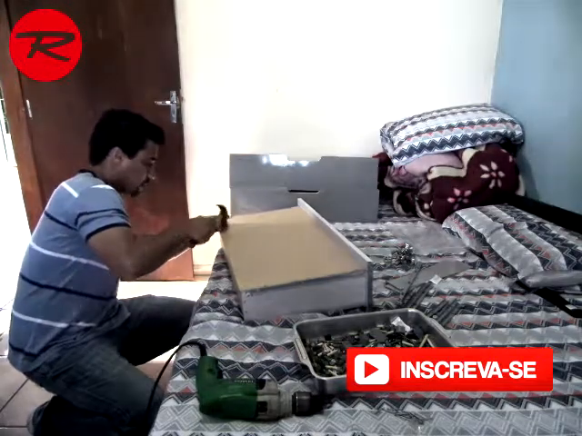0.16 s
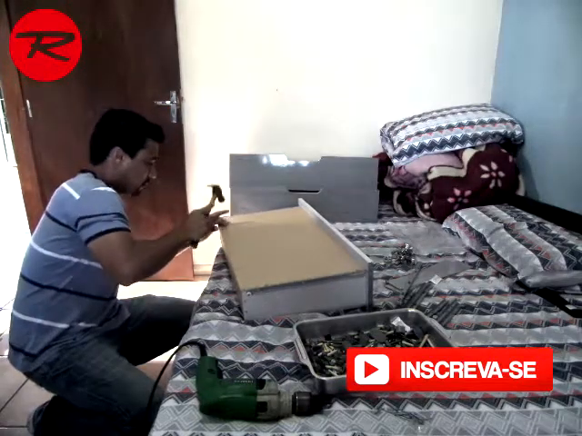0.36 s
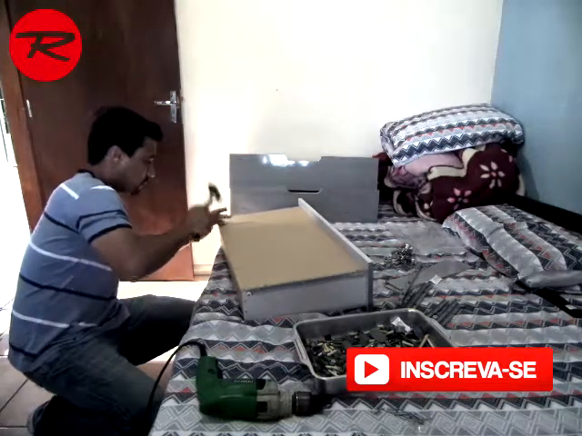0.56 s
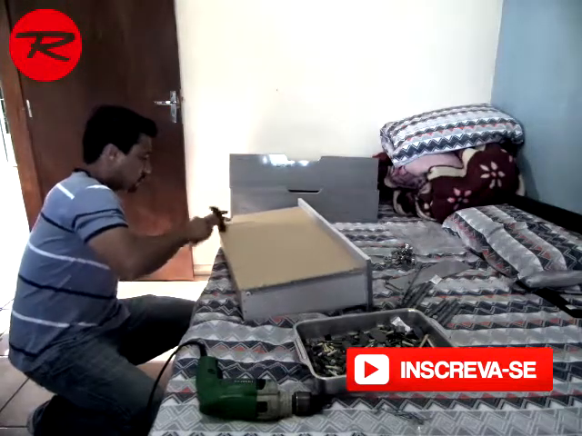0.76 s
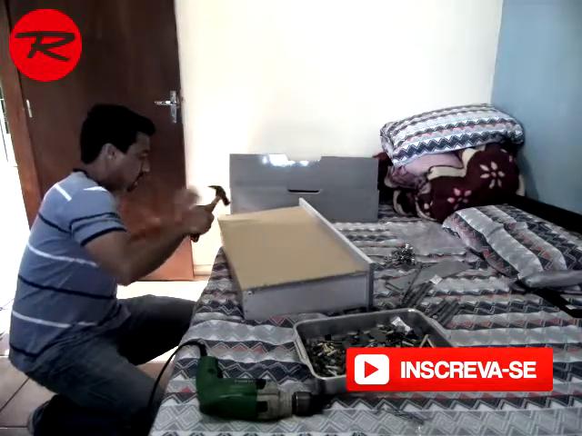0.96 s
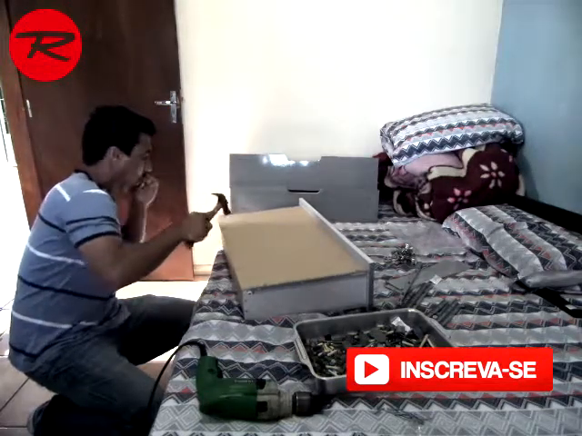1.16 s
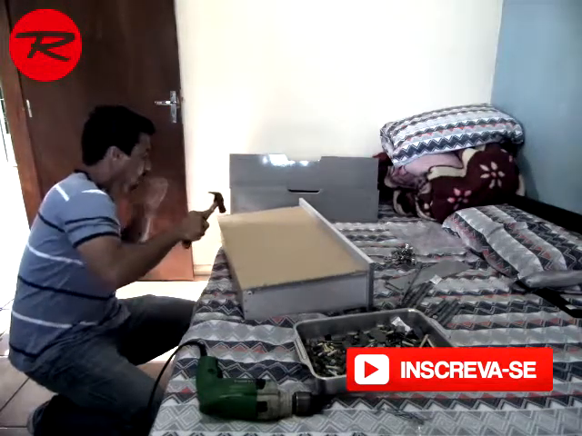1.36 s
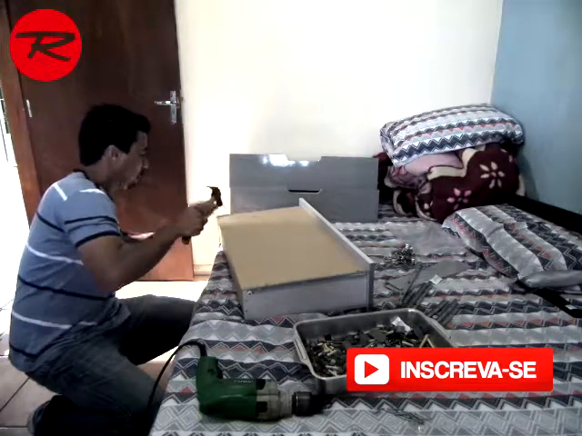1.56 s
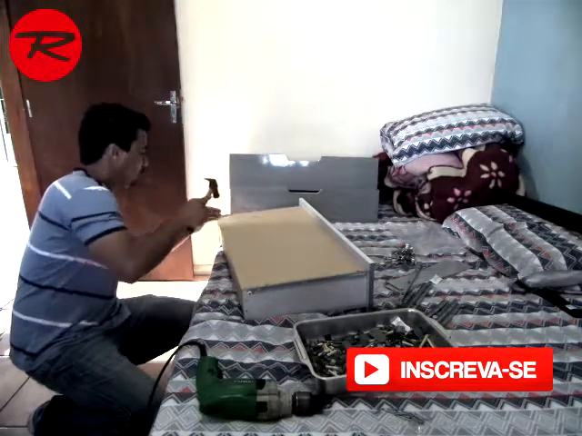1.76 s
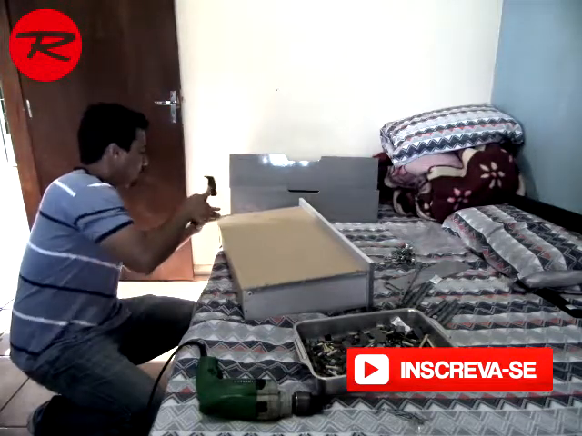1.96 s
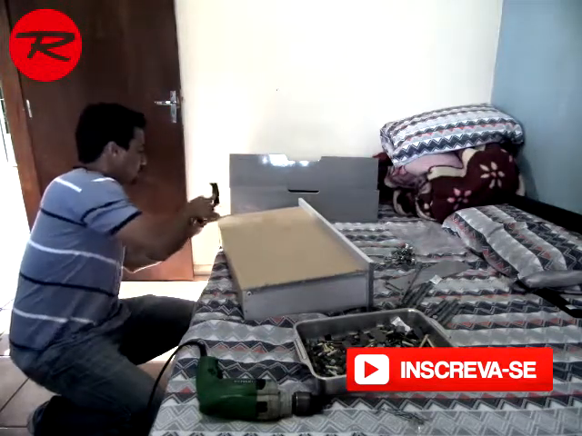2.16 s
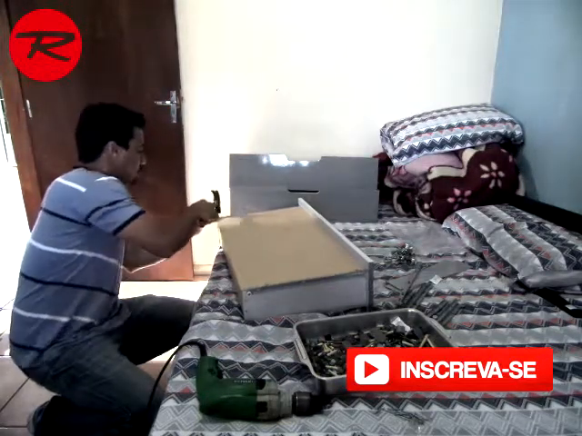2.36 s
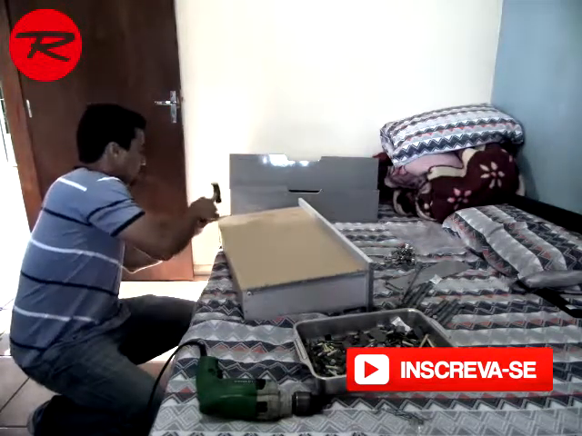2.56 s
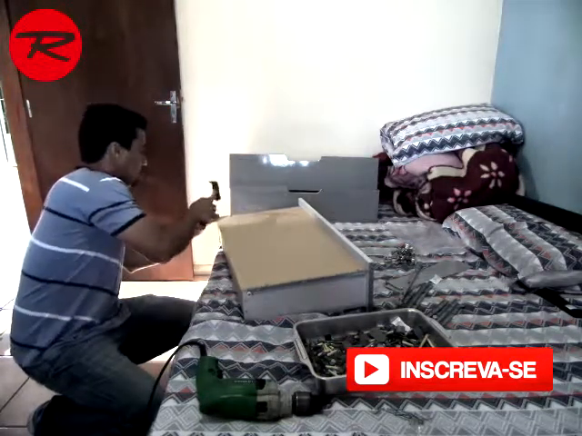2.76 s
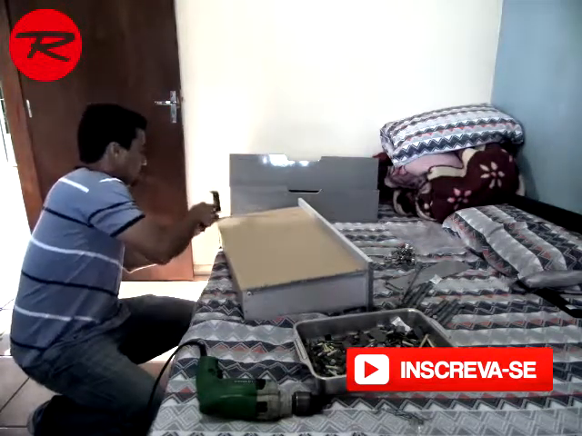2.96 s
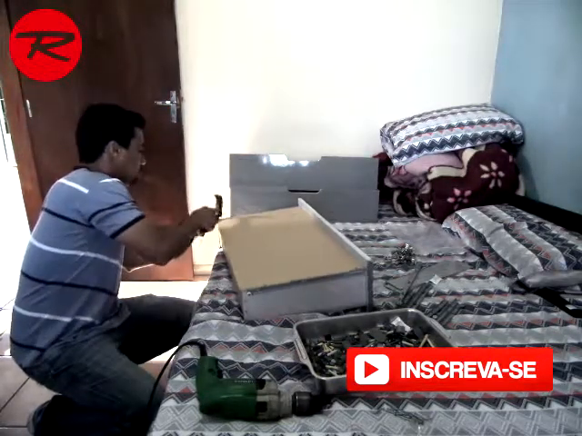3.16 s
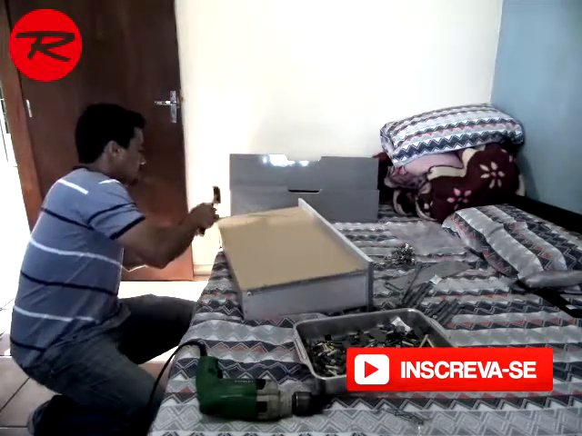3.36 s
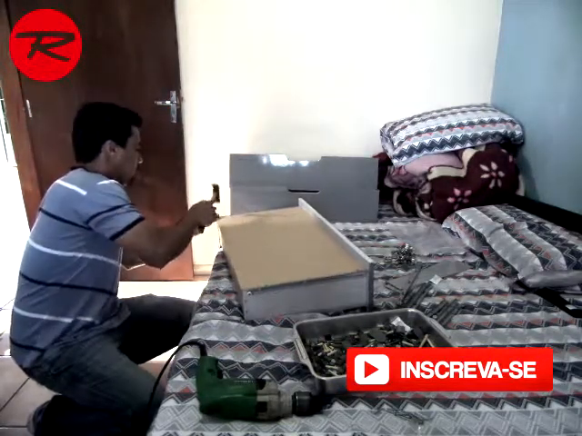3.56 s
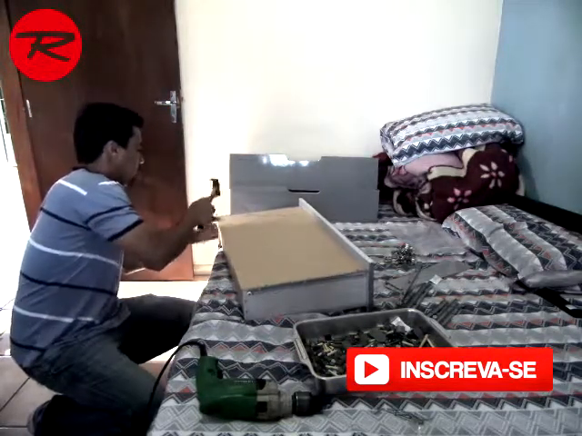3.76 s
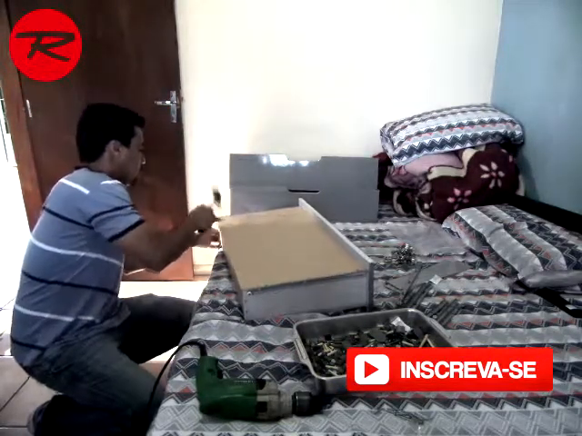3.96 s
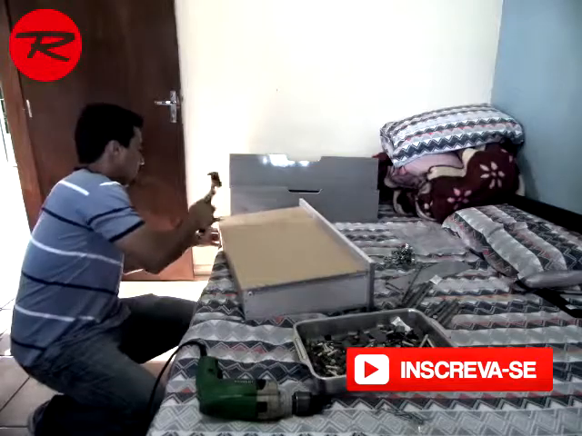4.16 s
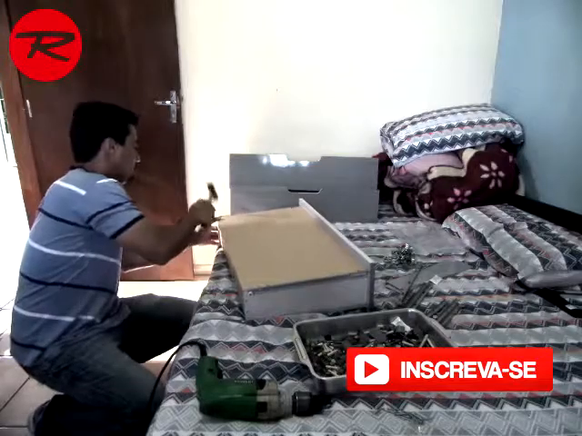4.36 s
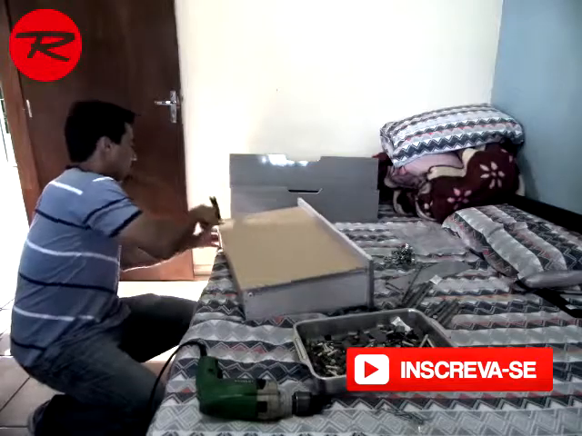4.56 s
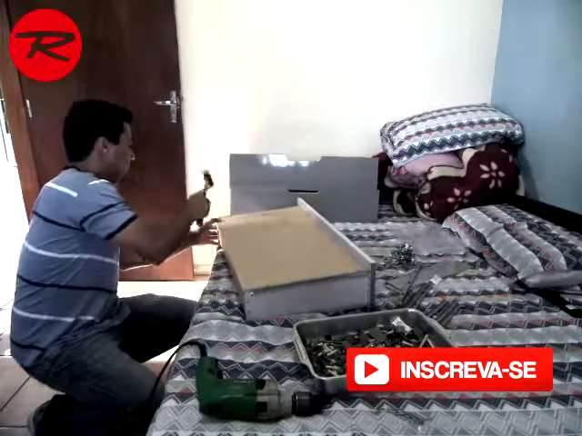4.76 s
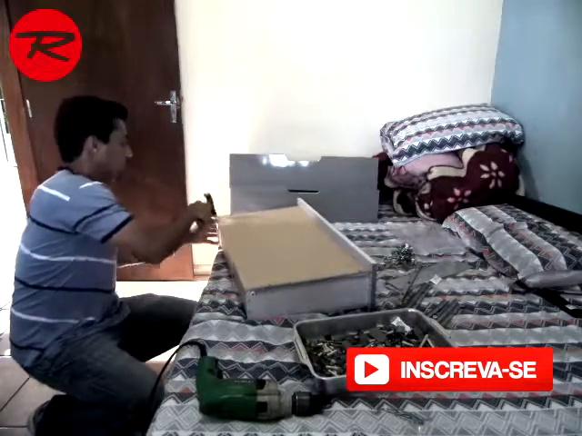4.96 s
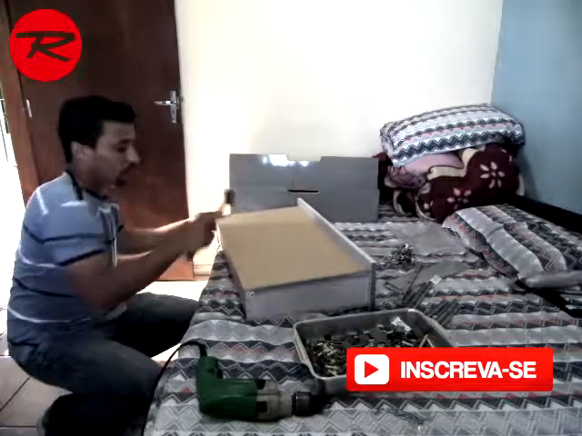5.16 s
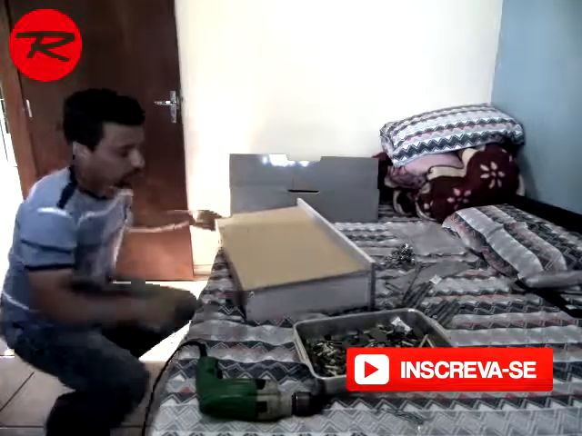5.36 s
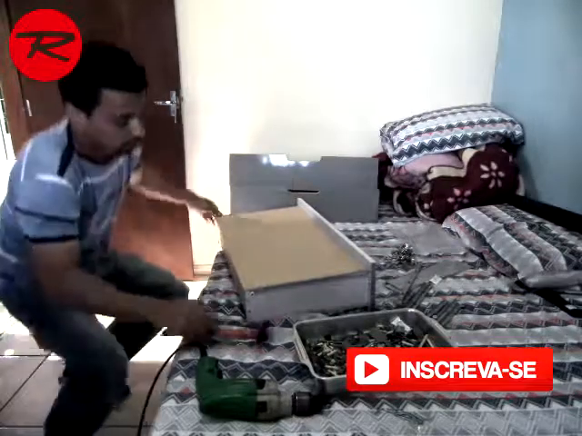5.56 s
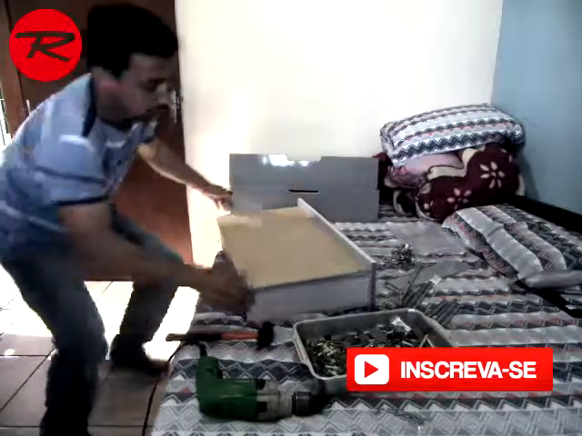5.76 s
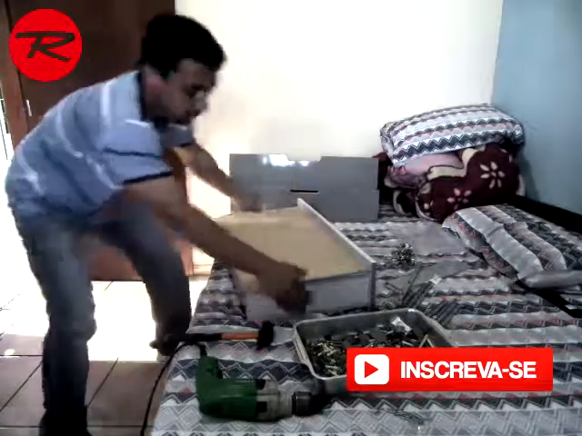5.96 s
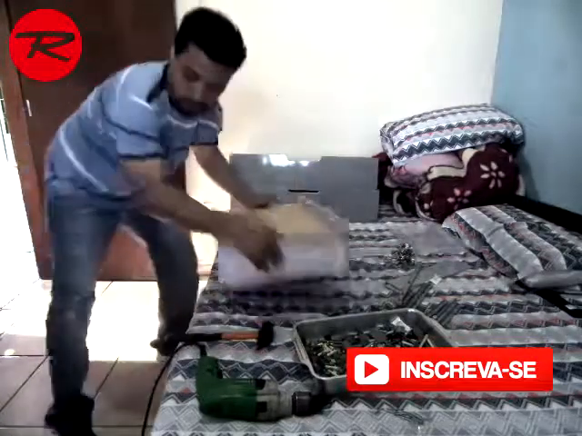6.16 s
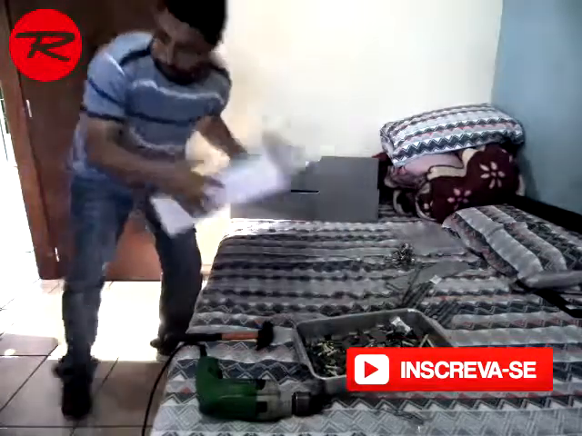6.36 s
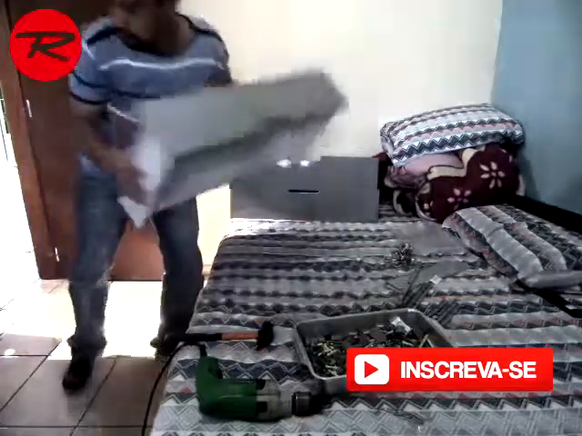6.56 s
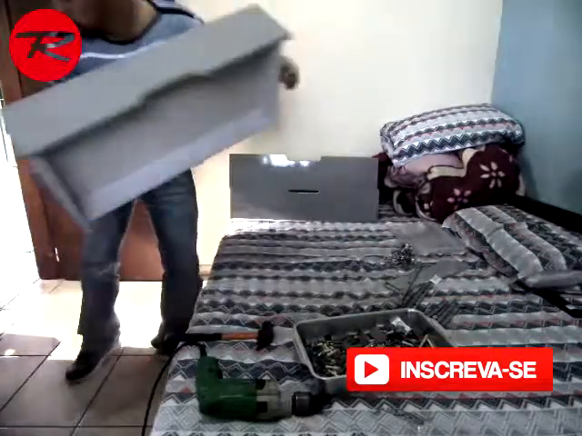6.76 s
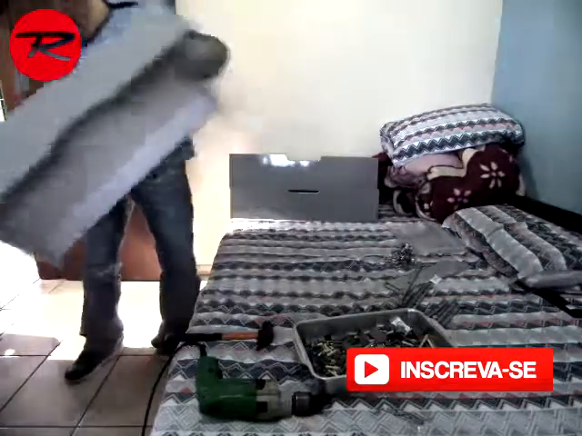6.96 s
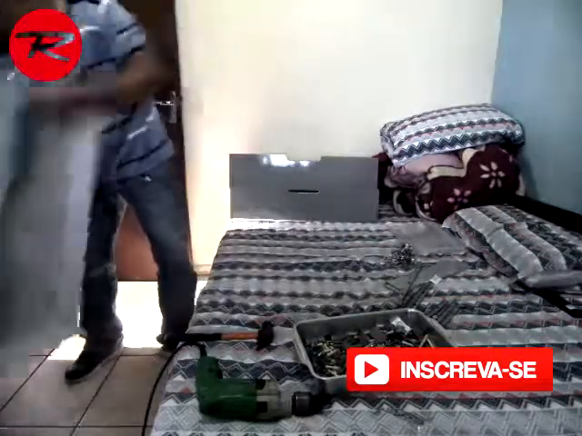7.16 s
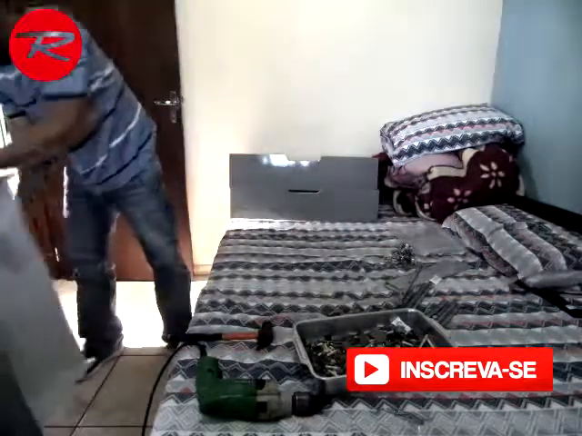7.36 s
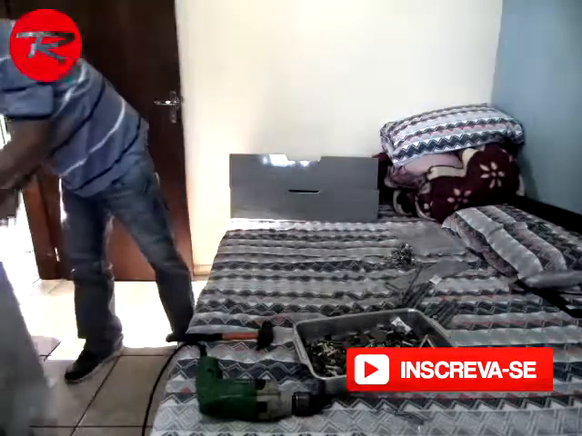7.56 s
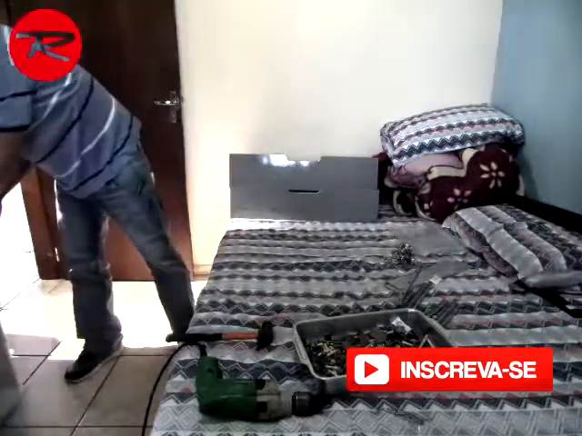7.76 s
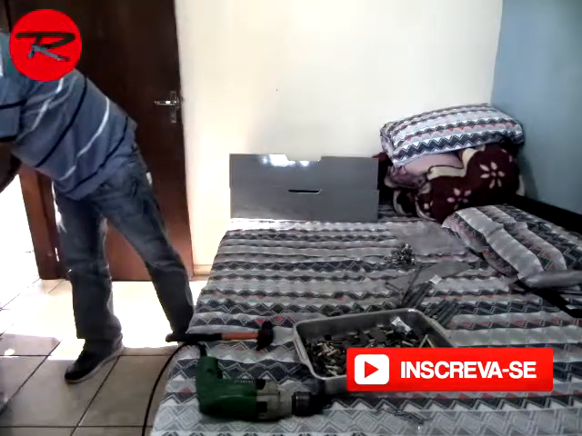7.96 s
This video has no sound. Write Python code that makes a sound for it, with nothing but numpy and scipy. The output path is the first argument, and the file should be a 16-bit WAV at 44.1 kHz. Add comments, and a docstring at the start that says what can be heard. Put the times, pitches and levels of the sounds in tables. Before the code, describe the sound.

Close, sharp hammer blows drive nails into a hollow wooden panel in three short runs, ringing briefly in a small room. A faint nail clink and two gentle taps come between the first two runs. After the hammering stops, soft footsteps, fabric swishes and small squeaks follow the drawer being lifted and carried, until it lands on the tiled floor with a wooden thud and a click of fittings. A faint hum lies underneath.

```python
"""A small, hard-walled room, where three nails are hammered into the bottom of a drawer lying on a bed.
Each blow is a steel tick, a crack and the boom of the panel; a fast limiter catches the hardest peaks.
A loose nail clinks as it is picked up. Then feet shuffle, clothes rustle and wood rubs and squeaks as
the drawer is lifted, swung round and set down on the tiled floor, its frame knocking and its fittings
clacking. Quiet air and a faint hum lie underneath, and a low drone grows towards the end."""
import sys
import numpy as np
from scipy import signal
from scipy.io import wavfile
from scipy.ndimage import uniform_filter1d, minimum_filter1d

SR = 44100
rng = np.random.default_rng(int(sys.argv[2]) if len(sys.argv) > 2 else 0)


def transcribe(signal):
    """Save signal, clipped to [-1, 1], as a 16-bit WAV file at the path in sys.argv[1]."""
    frames = np.atleast_2d(signal).T
    limited = np.clip(frames, -1, 1)
    pcm = np.round(limited * 32767).astype(np.int16)
    wavfile.write(sys.argv[1], SR, pcm)


N = 352800
TIME = np.arange(N) / SR
AGE = TIME[:SR * 3 // 4]   # seconds since an impact
CUTOFF_HZ = 15650
EDGES_HZ = np.geomspace(22, 17500, 28)
CENTRES_HZ = np.sqrt(EDGES_HZ[1:] * EDGES_HZ[:-1])
BANK = [signal.butter(2, edge, "band", fs=SR, output="sos") for edge in zip(EDGES_HZ, EDGES_HZ[1:])]

# noise colours, shape only: frequency_hz, density_db
AIR = [(25, -10), (50, -0.5), (80, -15), (130, -10), (220, -10), (330, -15.5), (600, -16), (1200, -24),
       (2000, -26.5), (5000, -32.5), (16000, -39)]   # room tone
SHUFFLE = [(70, -40.5), (150, 2.5), (250, -6.5), (400, -15), (700, -19.5)]   # feet
RUBBING = [(250, -10), (500, 0.5), (1000, -4.5), (1800, -8.5), (3500, -15)]   # wood on the bedcover
CLOTH = [(1800, -11.5), (3200, -4), (6000, -6.5), (9000, -9.5), (13000, -7.5), (16000, -10)]   # hiss of fabric
BUMP_THUMP = [(45, 13), (65, -26), (95, -9), (130, -4), (200, 16), (320, 0)]   # low end of a bump
BUMP_KNOCK = [(200, -37), (350, 6.5), (600, 4), (900, -6), (1400, -6.5), (2800, -20.5)]   # its woody middle
BOOM = [(30, -20.5), (42, -25.5), (55, -9), (85, -34.5), (112, -25.5), (145, -7), (200, -1.5), (320, -7.5)]   # low end of a hammer blow
KNOCK = [(200, -25), (330, -2), (600, 0), (950, -3.5), (1280, -4), (1800, -9), (2600, -16.5)]   # its woody middle
CRACK = [(1300, -23), (2200, 3), (3200, 1.5), (5000, -1.5), (8000, -6), (11000, -15.5)]   # hard edge of a hit
PING = [(6000, -22), (9500, -13.5), (11000, 0), (12500, -2), (15000, 2), (16500, -8)]   # steely top

# the room's decay: frequency_hz, t60_s
ROOM_T60 = [(60, 0.66), (170, 0.34), (500, 0.4), (1500, 0.42), (3000, 0.41), (5500, 0.38), (8000, 0.35),
            (11000, 0.3), (16000, 0.19)]
# faint hum: pitch_hz, rms_db
HUM = [(54, -73.5), (194, -77), (258, -75), (361, -79)]
# shifting along the drawer, then carrying it: start_s, end_s, start_db, end_db
MOVES = [(1.405, 3.997, -73, -57.5), (5.404, 7.778, -72, -57.5)]
# swishes of clothes and bedcover: peak_s, rise_s, rub_db, hiss_db
SWISHES = [(3.64, 0.033, -58, -57.5), (5.48, 0.057, -84, -81), (5.85, 0.036, -67, -63),
           (6.12, 0.069, -72, -69.5), (6.32, 0.095, -81, -62.5), (6.73, 0.06, -60.5, -57.5),
           (7.0, 0.053, -57.5, -61.5), (7.07, 0.055, -76, -60), (7.35, 0.039, -68, -68)]
# squeaks of wood and fittings: peak_s, half_length_s, pitch_hz, width_hz, relative_db
SQUEAKS = [(6.313, .04, 1600, 28, -70), (6.471, 0.022, 1595, 18, -59), (6.755, 0.056, 5400, 570, -61),
           (6.822, 0.034, 1730, 257, -56.5), (6.893, .025, 4320, 120, -68), (7.06, 0.032, 1720, 150, -62),
           (7.134, 0.084, 3250, 190, -64.5)]
# the drawer handled and set down, levels before trim: start_s, thump_db, knock_db, rattle_db
BUMPS = [(5.969, -48, -72, -83), (6.754, -45, -49, -58), (7.348, -57, -59.5, -76), (7.786, -21, -20, -33)]
# clicks of its fittings, levels before trim: start_s, clack_db, ping_db
CLICKS = [(7.3407, -70, -57), (7.896, -36.5, -38.5)]
# modes of the drawer's frame: pitch_hz, relative_db, t60_s
FRAME_MODES = [(133.2, -11, 0.99), (191, -9, 0.4), (267, 3, 0.33), (328, -9, 0.49), (406.7, 5, 0.28),
               (529, 7, 0.23), (598, 3, 0.27), (633, -11, .26), (915, -27, 0.33)]
# modes of a loose nail: pitch_hz, relative_db, t60_s
NAIL_MODES = [(2620, -10, 0.37), (3180, -3, 0.23), (3494, -2, 0.23), (3580, -6, 0.23), (4888, -11, .28),
              (5281, -12, .3), (6060, -5, 0.23), (6150, -6, 0.24), (7472, -13, 0.32)]
# modes of the panel, driven differently from each nail: pitch_hz, first_db, second_db, third_db
PANEL_MODES = [(143.4, -4.5, -8, -10), (159.75, -3, -6.5, -3), (205.3, 1, 5.5, -0.5),
               (216.3, -10.5, -3, -3.5), (249.6, -1, 2, -3.5), (275, 0.5, 2, -0.5), (293, -4.5, -5, -17.5),
               (353, -10.5, -8.5, -14), (401, -18, -14.5, -16), (435, -3, -1, -9), (461, -6, -5.5, -5),
               (510, -13.5, -19.5, -9.5), (595, -11.5, -8.5, -14), (649, -14, -9, -17.5),
               (852, -9.5, -29, -15), (951, -16, -20.5, -13.5), (1256, -14.5, -14, -14.5)]
# hammer blows: start_s, force_db, give (0 = the nail is home, 1 = it sinks freely)
BLOWS = [(0.105, -1.44, 0.61), (0.407, -2, 0.73), (0.686, -0.9, 0), (2.311, -17, 0.56), (2.599, -17, 0.84),
         (2.865, -4, 0.48), (3.109, -2, 0.52), (3.386, -1, 0.58), (3.964, -2.35, 1), (4.227, -2.6, 1),
         (4.502, -0.05, 0.31), (4.802, -0.5, 0.084)]


def from_db(db):
    """Decibels to gain."""
    return 10 ** (np.asarray(db) / 20)


def at_hz(points, hz, outside=None):
    """Read a table on a log-frequency axis."""
    known, values = np.transpose(points)
    return np.interp(np.log(hz), np.log(known), values, outside, outside)


def colour(spectrum, db=0):
    """Band gains that give white noise this colour at about this rms level."""
    gains = from_db(at_hz(spectrum, CENTRES_HZ, outside=-np.inf))
    return from_db(db) * gains / np.sqrt(np.sum(gains ** 2 * np.diff(EDGES_HZ)) * 2 / SR)


def noise(spectrum):
    """Steady coloured noise, rms about 1."""
    white = rng.standard_normal((2, N))
    return sum(g * signal.sosfilt(BANK[k], white[k % 2]) for k, g in enumerate(colour(spectrum)) if g > 0)


def low_cut(sound, hz, order=2):
    """Roll off everything below hz."""
    return signal.sosfilt(signal.butter(order, hz, "high", fs=SR, output="sos"), sound)


def add(out, start_s, sound):
    """Mix a sound in at its time."""
    start = round(start_s * SR)
    low, high = max(start, 0), min(start + len(sound), N)
    out[low:high] += sound[low - start:high - start]


def attack(build_s):
    """An envelope that swells from 0 to 1."""
    return 1 - np.exp(-AGE / build_s)


def decay(t60_s):
    """An envelope that falls 60 dB in t60_s."""
    return np.exp(-np.log(1000) * AGE / t60_s)


def ramp(start_s, end_s, start_db, end_db, fade_s=.1):
    """A steady fader ride that dies away at both ends."""
    outside_s = np.maximum(np.maximum(start_s - TIME, TIME - end_s), 0)
    ride_db = np.interp(TIME, [start_s, end_s], [start_db, end_db])
    return from_db(ride_db) * np.exp(-(outside_s / fade_s) ** 2)


def wavering(hz, width_hz):
    """A tone of rms 1 whose wandering phase blurs its pitch."""
    wander = np.sqrt(2 * np.pi * width_hz / SR) * np.cumsum(rng.standard_normal(N))
    return np.sqrt(2) * np.sin(2 * np.pi * hz * TIME + wander)


def room_tone():
    """Quiet air and a faint, wavering hum."""
    return from_db(-69) * noise(AIR) + sum(from_db(db) * wavering(hz, width_hz=11) for hz, db in HUM)


def drone():
    """A low tone grows as the drawer is carried off."""
    return ramp(start_s=6, end_s=8, start_db=-67.5, end_db=-56.5) * wavering(hz=159, width_hz=13.67)


def swish(peak_s, rise_s, release_ratio=2.1):
    """The envelope of one sweep of cloth: it rises to 1 and fades more slowly."""
    slope_s = np.where(TIME < peak_s, rise_s, rise_s * release_ratio)
    return np.exp(-((TIME - peak_s) / slope_s) ** 2)


def catching(depth_db=2.0, per_s=70):
    """Rubbing surfaces catch and slip, so their level is lumpy."""
    steps = rng.standard_normal(4000)
    return from_db(depth_db * np.interp(TIME * per_s, np.arange(len(steps)), steps))


def movement():
    """Feet shuffle, wood rubs on the bedcover and cloth hisses, with single swishes on top."""
    effort = sum(ramp(*move) for move in MOVES)
    rub = sum(from_db(db) * swish(peak_s, rise_s) for peak_s, rise_s, db, _ in SWISHES)
    hiss = sum(from_db(db) * swish(peak_s, rise_s) for peak_s, rise_s, _, db in SWISHES)
    layers = [(SHUFFLE, effort),
              (RUBBING, np.hypot(rub, from_db(-4.5) * effort)),
              (CLOTH, np.hypot(hiss, from_db(-9.5) * effort))]
    return sum(level * catching() * noise(spectrum) for spectrum, level in layers)


def squeaks():
    """Wood and fittings scrape in short, rough tones."""
    return sum(from_db(db - 1) * np.exp(-((TIME - peak_s) / half_s) ** 2) * wavering(hz, width_hz)
               for peak_s, half_s, hz, width_hz, db in SQUEAKS)


def wash(gains, build_s, merge_s=.0033):
    """A hit in the room: separate early reflections thicken into noise that dies band by band."""
    spread = np.exp(-AGE / merge_s)
    grains = np.repeat(rng.standard_normal(len(AGE)), 16)[:len(AGE)]
    lumps = np.exp(spread * grains - spread ** 2)
    white = rng.standard_normal((2, len(AGE))) * lumps * attack(build_s)
    fades = decay(at_hz(ROOM_T60, CENTRES_HZ)[:, None])
    return sum(g * signal.sosfilt(BANK[k], white[k % 2] * fades[k]) for k, g in enumerate(gains) if g > 0)


def struck(modes, build_s):
    """Modes set ringing by one short contact."""
    rings = sum(from_db(db) * decay(t60_s) * np.sin(2 * np.pi * (hz * AGE + rng.random()))
                for hz, db, t60_s in modes)
    return rings * attack(build_s)


def nail_clink():
    """A loose nail clicks and rings as it is picked up."""
    return wash(colour(CRACK, -60.5), build_s=.0029) + from_db(-59.5) * struck(NAIL_MODES, build_s=.0021)


def handling():
    """Bumps ring the drawer's frame and rattle its fittings; metal also clicks and clinks on its own."""
    out = np.zeros(N)
    for start_s, thump_db, knock_db, rattle_db in BUMPS:
        body = colour(BUMP_THUMP, thump_db - .5) + colour(BUMP_KNOCK, knock_db + 2.5)
        fittings = colour(CRACK, rattle_db - 4.5) + colour(PING, rattle_db - 12)
        add(out, start_s, wash(body + fittings, build_s=.0011))
        add(out, start_s, from_db(knock_db - 3.5) * struck(FRAME_MODES, build_s=.00087))
    for start_s, clack_db, ping_db in CLICKS:
        add(out, start_s, wash(colour(CRACK, clack_db) + colour(PING, ping_db + 2), build_s=.0011))
    add(out, start_s=1.709, sound=nail_clink())
    return out


def in_frame(sound, span_s=.02, echoes=12, energy_share=.13):
    """The shock bounces round the drawer's frame, which ripples the colour of each blow."""
    response = np.zeros(SR // 20)
    lags = (rng.uniform(.1, 1, echoes) * span_s * SR).astype(int)
    response[lags] = np.sqrt(energy_share / echoes) * rng.choice([-1, 1], echoes)
    response[0] = np.sqrt(1 - energy_share)
    return signal.fftconvolve(sound, response)


def panel(nail, build_s, pitch_drift=.012, vary_db=2.0):
    """The panel's modes swell and die with the room, shifting a little as the contact point moves."""
    hz, *db_by_nail = np.transpose(PANEL_MODES)[:, :, None]
    hz = hz * (1 + pitch_drift * rng.standard_normal(hz.shape))
    strength = from_db(db_by_nail[nail] + vary_db * rng.standard_normal(hz.shape))
    rings = decay(at_hz(ROOM_T60, hz)) * np.sin(2 * np.pi * (hz * AGE + rng.random(hz.shape)))
    return np.sum(strength * rings, axis=0) * attack(build_s)


def punch(pitch_hz=624, decay_s=.00068):
    """The head lands on the wood: one damped swing of the panel. The open drawer radiates little bass."""
    swing = np.exp(-AGE / decay_s) * np.sin(2 * np.pi * pitch_hz * AGE)
    return low_cut(swing, hz=290)


def nail_zing(decay_s=.004):
    """The nail zings for a few milliseconds as it bites into the wood."""
    burst = np.exp(-AGE / decay_s) * rng.standard_normal(len(AGE))
    return low_cut(burst, hz=10000)


def tick(ring_hz=14200, decay_s=.0003):
    """Steel on steel: one sharp spike and a very brief, very high ring."""
    hz = min(ring_hz * (1 + .04 * rng.standard_normal()), CUTOFF_HZ)
    ring = np.exp(-AGE / decay_s) * np.cos(2 * np.pi * hz * AGE)
    spike = AGE == 0
    return low_cut(ring + spike, hz=4000, order=1)


def hammering(next_nail_s=(1.5, 3.7), nail_crack_db=(-21, -21, -22), nail_ping_db=(-19, -29, -21.5)):
    """Every blow rings panel, frame and nail together; light taps keep their boom but lose their steel."""
    out = np.zeros(N)
    early_blow = (-.14, *BLOWS[0][1:])   # still ringing as the scene opens
    for start_s, force_db, give in [early_blow, *BLOWS]:
        nail = np.searchsorted(next_nail_s, start_s)
        # a nail that gives pushes the panel for longer: more boom and ping, less crack, a slower swell
        boom_db = -27 + .84 * force_db + 12.5 * give
        crack_db = nail_crack_db[nail] + 1.59 * force_db - 2.5 * give
        ping_db = nail_ping_db[nail] + 1.9 * force_db + 5.5 * give
        swell_s = .0013 + .008 * give ** 2.9
        wood = colour(BOOM, boom_db - 4.5) + colour(KNOCK, force_db - 19)
        steel = colour(CRACK, crack_db) + colour(PING, ping_db + 2.5)
        add(out, start_s - .002, in_frame(wash(wood, build_s=swell_s)))
        add(out, start_s - .002, from_db(boom_db - 1.3) * panel(nail, build_s=2.9 * swell_s))
        add(out, start_s - .001, in_frame(wash(steel, build_s=.0026)))
        add(out, start_s + .003, from_db(force_db - 3 - 10 * give) * punch())
        add(out, start_s + .001, from_db(ping_db + 9.5) * nail_zing())
        add(out, start_s + .0015, from_db(crack_db + 21) * tick())
    return out


def scene():
    """The hammer up front, the handling and the room far below it, in mono."""
    return (drone() + hammering() + handling() + movement() + squeaks() + room_tone())[None]


def limiter(sound, ceiling_db=-5, ahead_s=.0039, release_db_per_s=3000):
    """The gain drops just ahead of a peak and springs back within milliseconds."""
    over_db = np.maximum(20 * np.log10(np.abs(sound) + 1e-9) - ceiling_db, 0)
    window = 2 * int(ahead_s * SR / 2) + 1
    coming_db = -minimum_filter1d(-over_db, window, origin=-(window // 2))
    release_db = release_db_per_s * TIME
    cut_db = np.maximum.accumulate(coming_db + release_db, axis=-1) - release_db
    return sound * from_db(-uniform_filter1d(cut_db, size=21))


def record(dry):
    """Peaks are limited, then the very top is cut steeply."""
    high_cut = signal.ellip(10, .1, 90, CUTOFF_HZ, fs=SR, output="sos")
    return signal.sosfilt(high_cut, limiter(dry))


dry = scene()
out = record(dry)
transcribe(out)
```